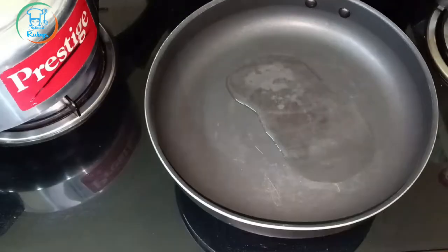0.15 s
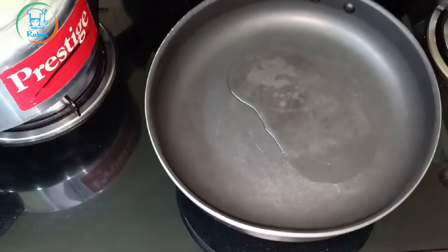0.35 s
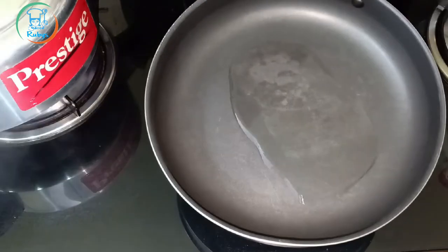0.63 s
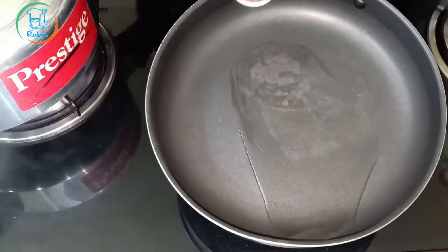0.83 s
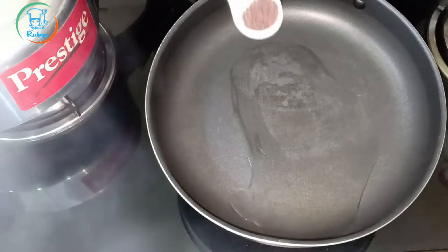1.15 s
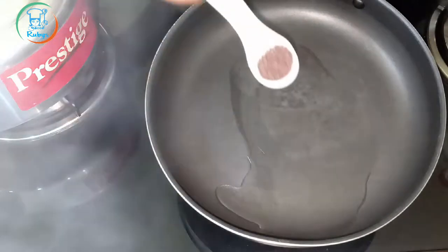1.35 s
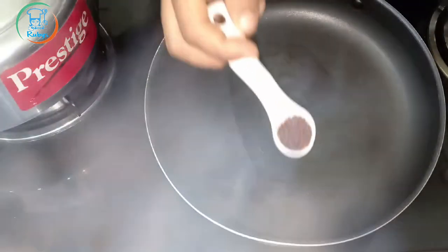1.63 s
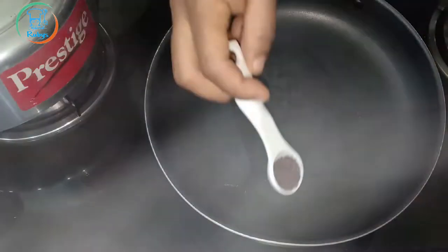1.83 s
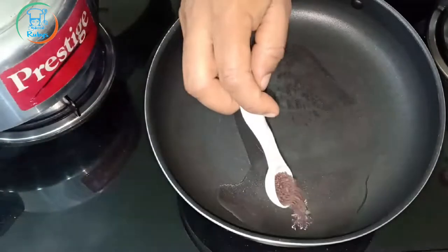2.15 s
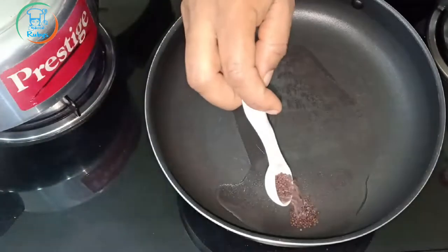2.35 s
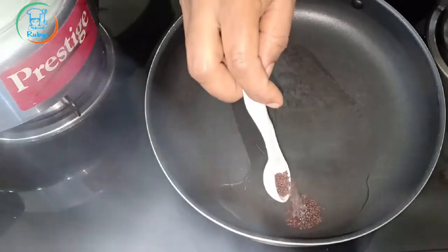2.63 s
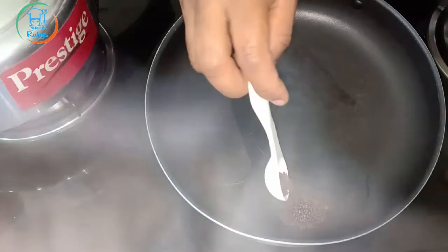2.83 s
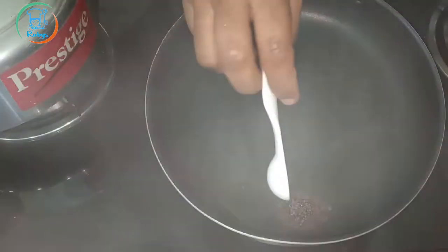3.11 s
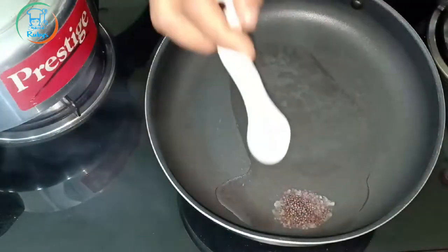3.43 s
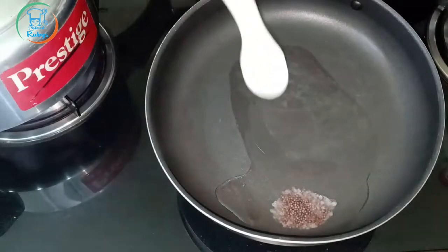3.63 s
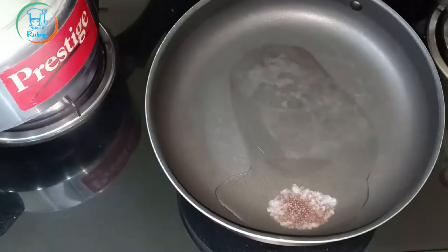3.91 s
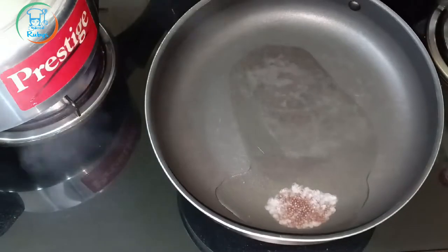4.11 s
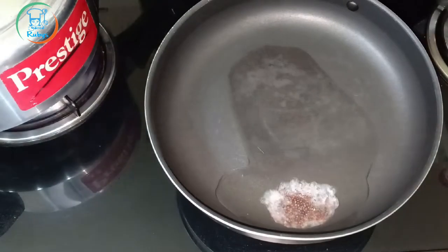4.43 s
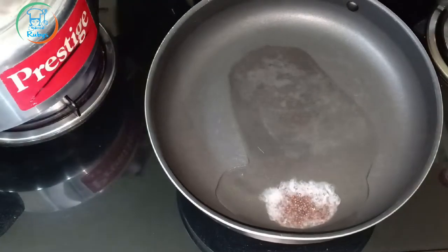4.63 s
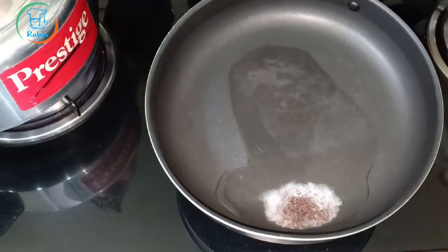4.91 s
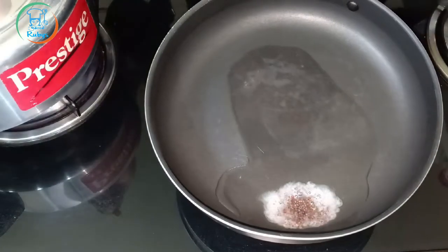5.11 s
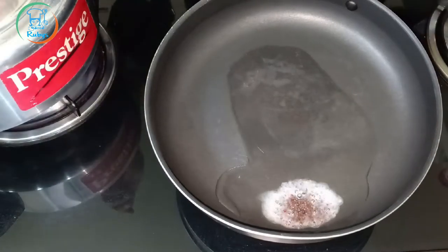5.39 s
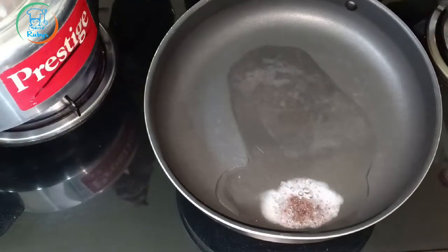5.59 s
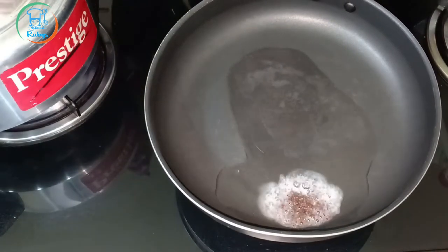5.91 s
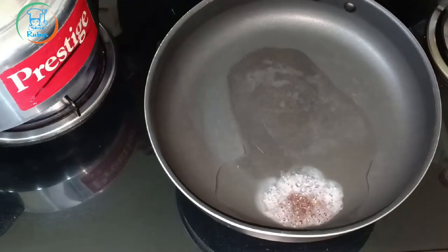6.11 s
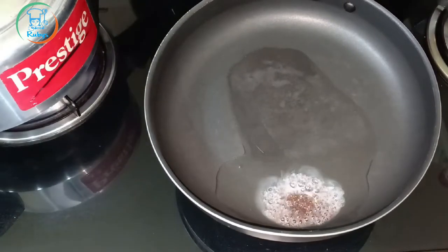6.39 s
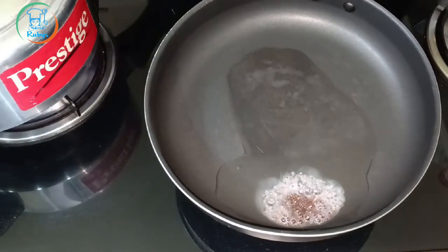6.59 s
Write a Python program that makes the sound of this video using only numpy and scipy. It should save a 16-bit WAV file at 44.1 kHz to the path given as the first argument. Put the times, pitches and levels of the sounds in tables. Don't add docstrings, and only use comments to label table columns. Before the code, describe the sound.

In a small hard kitchen, a sudden roaring jet of cooker steam, with low rumble and thumps, stops abruptly and leaves near silence.

```python
import sys
import numpy as np
from scipy import signal
from scipy.fft import rfft, irfft, next_fast_len
from scipy.io import wavfile
from scipy.ndimage import uniform_filter1d, map_coordinates

SR = 44100
rng = np.random.default_rng(int(sys.argv[2]) if len(sys.argv) > 2 else 0)


def convert_level_to_amplitude(level_db):
    exponent = np.asarray(level_db, float) / 20
    return 10 ** exponent


def log_audio(samples):
    frames = np.atleast_2d(samples).T
    limited = np.clip(frames, -1, 1)
    pcm = np.round(limited * 32767).astype(np.int16)
    wavfile.write(sys.argv[1], SR, pcm)


N = 297675
TIME = np.arange(N) / SR

# t/s, level/dB
VALVE = [
    (0.3, -45),
    (0.365, -17),
    (0.395, -2),
    (0.47, 0),
    (4.935, -0.5),
    (4.98, -13.5),
    (5.1, -22.5),
    (5.35, -51),
    (5.8, -94),
]
POP_S = VALVE[2][0]


def unit(x):
    return x / np.sqrt(np.mean(x ** 2) + 1e-20)


def along(points, hz):
    f, value = np.transpose(points)
    return np.interp(np.log(hz + 1), np.log(f + 1), value)


def over_time(points):
    return np.interp(TIME, *np.transpose(points))


def sides(pan_db):
    return convert_level_to_amplitude(np.array([pan_db / 2, -pan_db / 2]))


def filtered(x, response):
    m = next_fast_len(N + SR // 4)
    return irfft(rfft(x, m) * response(np.fft.rfftfreq(m, 1 / SR)), m)[..., :N]


def wobble(rate, channels):
    knots = rng.standard_normal((channels, 400))
    return np.array([map_coordinates(k, [TIME * rate]) for k in knots])


def turbulence(spectrum, patchy_db, channels):
    z = signal.stft(rng.standard_normal((channels, N)), nperseg=512)[2]
    patches = uniform_filter1d(rng.standard_normal(z.shape[1:]), size=10, axis=0)
    patches = uniform_filter1d(patches, size=12, axis=1)
    noise = signal.istft(z * convert_level_to_amplitude(patchy_db * unit(patches)), nperseg=512)[1][:, :N]
    return unit(filtered(noise, lambda hz: convert_level_to_amplitude(along(spectrum, hz))))


def kitchen(parts, straight_db):
    # f/Hz, t60/s
    decay = [(300, 0.26), (1500, 0.29), (3000, 0.29), (6000, 0.18), (12000, 0.088)]
    # f/Hz, level/dB
    direct = [(900, -6.5), (1700, 3), (4800, -1.5), (6000, -12), (8000, -7.5), (9400, 1), (10800, -4.5),
              (12800, 3), (15000, -5.5)]
    # t/s, delay/microseconds
    lag = [(0, 273), (0.9, 267), (1.55, 268), (2.5, 295), (3.05, 276), (3.65, 274), (4.2, 262), (5.15, 272),
           (5.7, 289), (6.75, 286)]
    hz, t, z = signal.stft(rng.standard_normal((2, len(parts), int(0.6 * SR))), SR, nperseg=256)
    decaying = z * convert_level_to_amplitude(-60 * t / along(decay, hz)[:, None])
    tails = signal.istft(decaying, SR, nperseg=256)[1]
    tails = tails / np.linalg.norm(tails, axis=2, keepdims=True)
    delayed = np.pad(parts, ((0, 0), (90, 0)))
    walls = signal.fftconvolve(delayed[None], tails, axes=2)[..., :N].sum(1)
    right = filtered(parts.sum(0), lambda f: convert_level_to_amplitude(along(direct, f) + straight_db))
    hz, t, z = signal.stft(right, SR, nperseg=512)
    late_s = np.interp(t, *np.transpose(lag)) * 1e-6
    left = signal.istft(z * np.exp(-2j * np.pi * hz[:, None] * late_s), SR, nperseg=512)[1][:N]
    return walls + np.array([left, right])


def room_air():
    # f/Hz, density/dB
    air = [(18, -62.5), (40, -29.5), (90, -3.5), (190, -9.5), (300, -11.5), (900, -9), (1100, -14.5),
           (1500, -15.5), (2500, -41), (4000, -120)]
    # f/Hz, level/dB (rms)
    tones = [
        (193.8, -90),
        (931.3, -94),
    ]
    hum = 0
    for (hz, db), w in zip(tones, wobble(4.8, channels=2)):
        hum = hum + convert_level_to_amplitude(db + 2.0 + 3 * w) * np.sin(2 * np.pi * hz * TIME + 0.7 * w)
    left, right, both = turbulence(air, patchy_db=2.0, channels=3)
    louder_at_first = convert_level_to_amplitude(np.interp(TIME, [0.3, 5.3], [4.5, 0]))
    return louder_at_first * convert_level_to_amplitude(-82.5) * (both + 0.53 * np.array([left, right])) + hum


def leak():
    # f/Hz, density/dB
    slit = [(700, -44.5), (1300, -21.5), (1740, -10.5), (2050, -5.5), (2550, -6), (3600, -15.5), (5040, -7),
            (6030, 0.5), (7200, -10.5), (8750, -17.5), (11400, -13), (12050, -27.5), (13400, -15.5),
            (14800, -17), (15500, -28.5)]
    before_db = -62.5 + 7 * np.clip((TIME - 0.2) / 0.036, 0, 1)
    after_db = -73 + 3 * np.clip(TIME - 5.76, 0, None)
    level_db = np.where(TIME < POP_S, before_db, after_db)
    hiss = turbulence(slit, patchy_db=0.4, channels=2)
    body = filtered(hiss, lambda hz: 1 / (1 + (hz / 2800) ** 8))
    thinned = np.interp(TIME, [0.3, 5.3], [0.45, 0])
    return kitchen((hiss - thinned * body) * convert_level_to_amplitude(level_db), straight_db=-3.0)


def weight():
    # t/s, level/dB (peak)
    click = [
        (0.213, -20.5),
    ]
    # f/Hz, level/dB, t60/s
    modes = [(467, -4.5, 0.017), (680, -0.5, .012), (870, 10, 0.01), (1070, 2.5, 0.011), (1508, 3.5, 0.032),
             (2180, -6, 0.05), (2490, -9.5, .05), (3510, -11.5, 0.018), (4480, -14.5, .015), (5620, 4, .03)]
    # t/s, f/Hz, bandwidth/Hz, level/dB, swell/s, t60/s
    settle = [
        (4.95, 796, 43, -39.5, 0.024, 0.28),
        (4.97, 283, 30, -48, 0.016, 0.2),
        (5.09, 681, 4.4, -42, 0.087, 0.29),
        (5.1, 463, 30, -63, .02, 0.18),
    ]
    x, t = np.zeros(N + SR), np.arange(SR // 2) / SR

    def breath(kind, edges_hz, order):
        sos = signal.butter(N=order, Wn=edges_hz, btype=kind, fs=SR, output="sos")
        return signal.sosfilt(sos, rng.standard_normal(len(t)))

    contact = 1 - np.exp(-t / 0.0006)
    for s, db in click:
        ring = sum(convert_level_to_amplitude(level - 60 * t / t60) * np.sin(2 * np.pi * hz * t) for hz, level, t60 in modes)
        rattle = 0.19 * convert_level_to_amplitude(-60 * t / 0.055) * breath("band", [400, 3000], 2)
        x[round((s + 0.0008) * SR):][:len(t)] += convert_level_to_amplitude(db - 6.5) * contact * (ring + rattle)
    for s, hz, width_hz, db, swell, t60 in settle:
        tone = unit(breath("band", [hz - width_hz / 2, hz + width_hz / 2], 1))
        x[round(s * SR):][:len(t)] += convert_level_to_amplitude(db - 60 * t / t60) * (1 - np.exp(-t / swell)) * tone
    no_bass = signal.butter(N=4, Wn=380, btype="high", fs=SR, output="sos")
    return convert_level_to_amplitude(-11) * kitchen(signal.sosfilt(no_bass, x[None, :N]), straight_db=12.5)


def jet():
    # f/Hz, density/dB
    nozzle = [(600, -35.5), (1100, -23), (1750, -17.5), (2050, -11.5), (2700, -6.5), (3500, -13),
              (4300, -6.5), (5200, -2), (5950, 3), (6700, -5), (8200, -9.5), (9500, -14), (11200, -10),
              (12700, -16.5), (15500, -9.5)]
    # t/s, level/dB
    whistle = [(0.4, -2), (0.57, 0), (0.75, -0.5), (1.2, 0), (1.78, -1), (1.87, -3), (2.1, -1.5),
               (2.27, -2), (2.33, -1), (2.73, 2.5), (2.96, -2.5), (3.35, 0.2), (3.65, -2), (3.9, 0.1),
               (4.34, -1.5), (4.45, -2.5), (4.62, -1.5), (4.7, 1.06)]
    # f/Hz, level/dB
    lean = [(60, 2), (130, 4.5), (290, 3.5), (640, 1.5), (1410, -0.5), (3100, -3), (6820, -0.5),
            (15000, -1)]
    swell_db = over_time(whistle)
    blown = np.clip(TIME - POP_S, 0, None)
    choke = np.clip((TIME - 4.9) / 0.15, 0, 1)
    steam = turbulence(nozzle, patchy_db=0.5, channels=4)
    low = filtered(steam, lambda hz: 1 / (1 + (hz / 4600) ** 14))
    high = filtered(steam, lambda hz: 1 / (1 + (7100 / (hz + 1)) ** 14))
    core = steam - low - high
    low_flow, high_flow, core_flow, sway = wobble(9, channels=4)
    flutter_db = 0.71
    wings_db = 0.59 * swell_db
    core_db = -28 + swell_db + flutter_db * core_flow
    low_db = -25.5 - 1.21 * blown - 4.5 * choke + wings_db + flutter_db * low_flow
    high_db = -25 - 0.9 * blown - 7.5 * choke + wings_db + flutter_db * high_flow
    high_db = high_db + 0.49 * wobble(24, channels=1)[0]
    parts = core * convert_level_to_amplitude(core_db) + low * convert_level_to_amplitude(low_db) + high * convert_level_to_amplitude(high_db)
    vented = parts * convert_level_to_amplitude(over_time(VALVE)) * (TIME > VALVE[0][0])
    heard = kitchen(vented, straight_db=-0.34)
    leaning = filtered(heard, lambda hz: sides(along(lean, hz)))
    return leaning * sides(0.66 - 0.11 * blown + 0.58 * sway)


def draught():
    # f/Hz, density/dB
    rush = [(18, -45.5), (30, -16.5), (80, -7.5), (172, -3), (360, -1), (877, 1.5), (1170, -6),
            (1600, -18.5), (2300, -24.5), (4000, -120)]
    # t/s, level/dB, width/s
    gusts = [
        (0.62, 2, 0.057),
        (1.73, 4, 0.068),
        (3.4, 9, 0.043),
        (4.37, 0, 0.047),
        (4.84, 2.5, 0.089),
    ]
    level_db = -44.5 - 0.36 * TIME
    for s, db, width in gusts:
        level_db = level_db + db * np.exp(-((TIME - s) / width) ** 2)
    pan_db = np.interp(TIME, [3.0, 3.35], [5, -0.6])
    blowing = np.interp(TIME, [0.36, 0.5, 4.93, 5.0, 5.2], [0.019, 0.86, 1, 0.11, 0.0073])
    lumps = convert_level_to_amplitude(1.4 * wobble(30, channels=2) + 1.7 * wobble(5.5, channels=2))
    flow = unit(lumps * turbulence(rush, patchy_db=-1.0, channels=2))
    return convert_level_to_amplitude(level_db) * sides(pan_db) * blowing * flow


def jumps():
    # t/s, level/dB, direction
    left_slips = [(0.6165, -34, -1), (1.0112, -26, 1), (1.0865, -14.5, 1), (1.1589, -29.5, -1),
                  (1.679, -25.5, -1), (1.6966, -27.5, -1), (1.722, -32, 1), (1.7713, -33, -1),
                  (2.0309, -34.5, -1), (2.7655, -35.5, -1), (3.3983, -34, -1), (4.0434, -34.5, 1)]
    # t/s, level/dB, direction
    right_slips = [(1.9262, -31.5, 1), (3.3492, -23.5, -1), (3.3916, -18.5, 1), (3.4192, -28, -1),
                   (3.5706, -30, 1), (3.6293, -13, 1), (3.659, -25, -1), (3.7505, -33.5, -1),
                   (3.8617, -35, 1), (3.9365, -29.5, 1), (4.117, -28.5, -1), (4.274, -36, 1),
                   (4.3526, -26.7, 1), (4.374, -30, -1), (4.851, -23.5, 1), (4.882, -33, -1),
                   (4.8983, -25, -1), (4.9203, -22.5, 1)]
    kicks = np.zeros((2, N))
    for port, slips in enumerate([left_slips, right_slips]):
        for s, db, direction in slips:
            kicks[port, round(s * SR)] = np.sign(direction) * convert_level_to_amplitude(db + 2.5)
    overshoot = signal.lfilter([1], [1, -np.exp(-1 / (0.00028 * SR))], kicks)
    steps = np.cumsum(kicks, axis=1) + 1.4 * overshoot
    bass_cut = signal.butter(N=3, Wn=95, btype="high", fs=SR, output="sos")
    rounded = signal.butter(N=1, Wn=4000, fs=SR, output="sos")
    return signal.sosfilt(rounded, signal.sosfilt(bass_cut, steps))


def scene():
    return room_air() + leak() + weight() + jet() + draught() + jumps()


def roll_off(x):
    return signal.sosfilt(signal.butter(12, 16870, fs=SR, output="sos"), x)


def record(dry):
    rest = [
        [8e-5],
        [1.1e-4],
    ]
    top_hz = 15465
    opened = dry * convert_level_to_amplitude(np.interp(TIME, [0.027, 0.031], [-10, 0]))
    squared = filtered(opened ** 2, lambda hz: 1 / (1 + (90 / (hz + 1)) ** 4))
    bent = opened - 0.35 * squared

    def band(hz):
        treble = np.clip((top_hz + 100 - hz) / 200, 0, 1) ** 2
        return treble / (1 + (30 / (hz + 1)) ** 2)

    return roll_off(filtered(bent, band) + rest)


dry = scene()
out = record(dry)
log_audio(out)
```